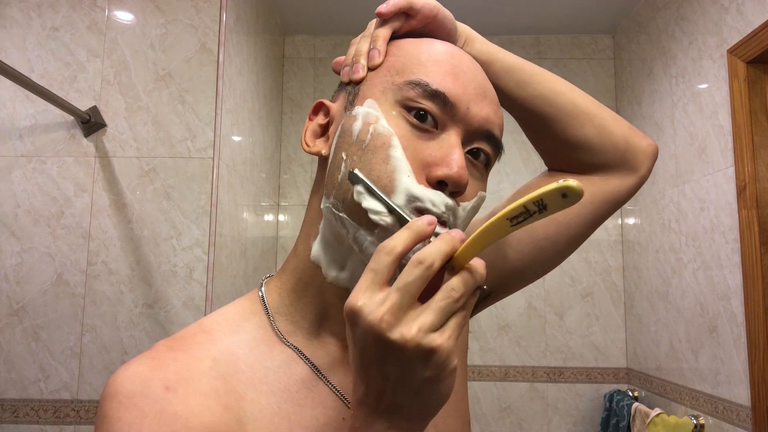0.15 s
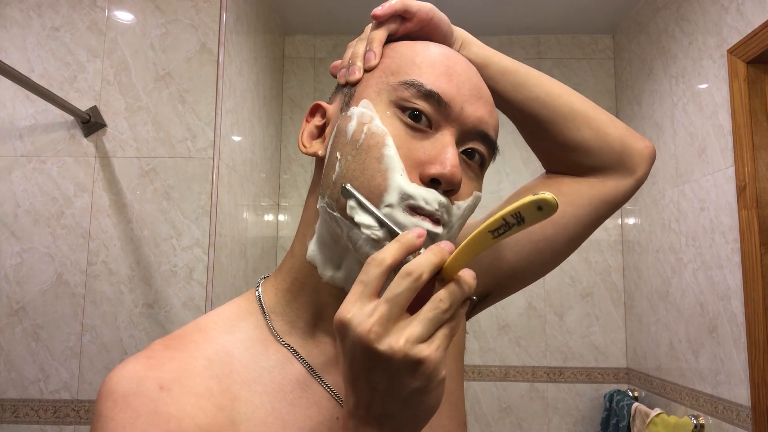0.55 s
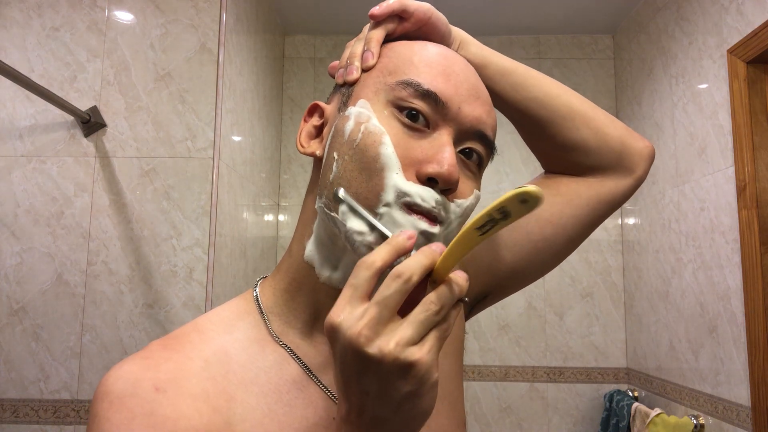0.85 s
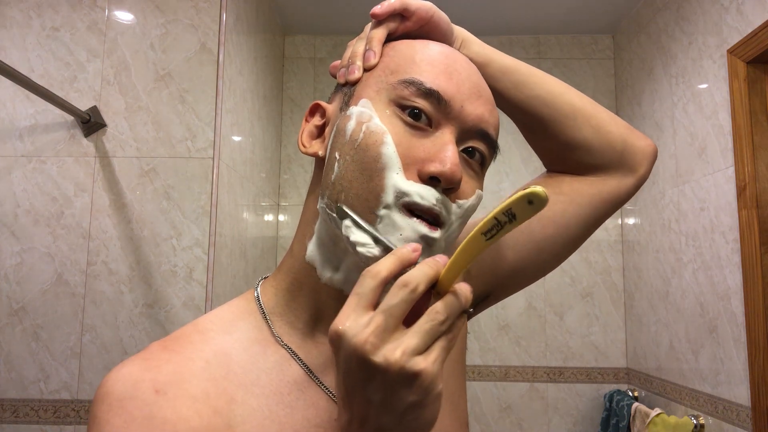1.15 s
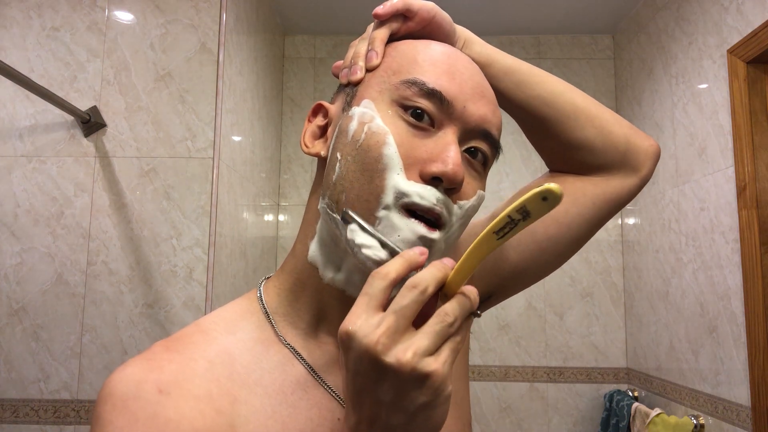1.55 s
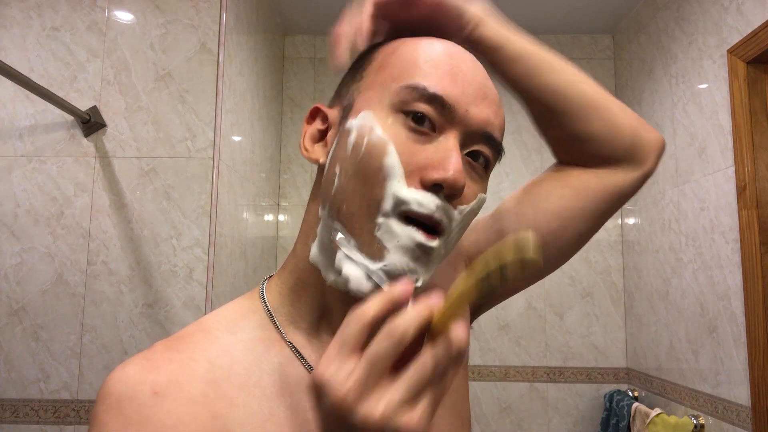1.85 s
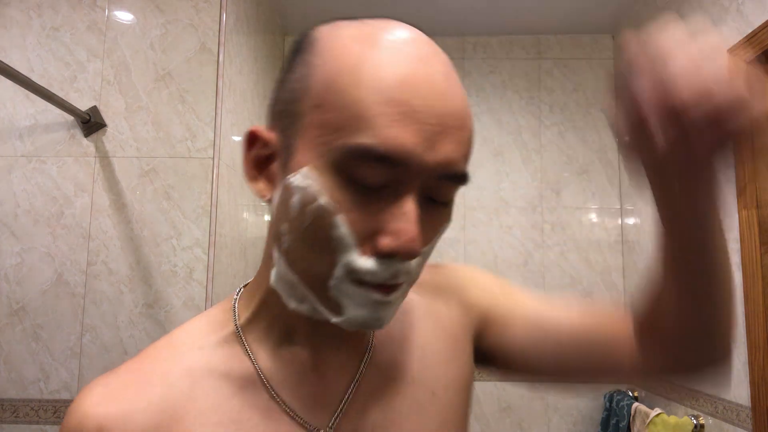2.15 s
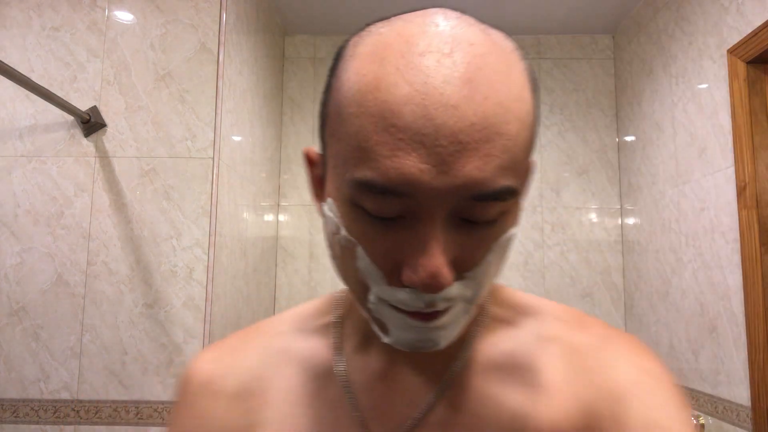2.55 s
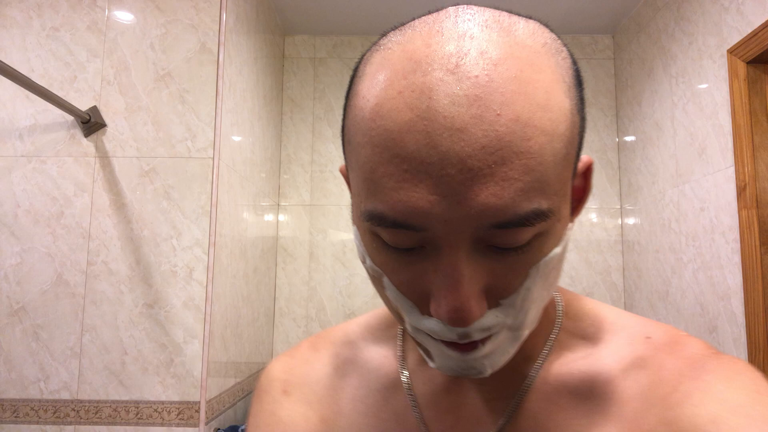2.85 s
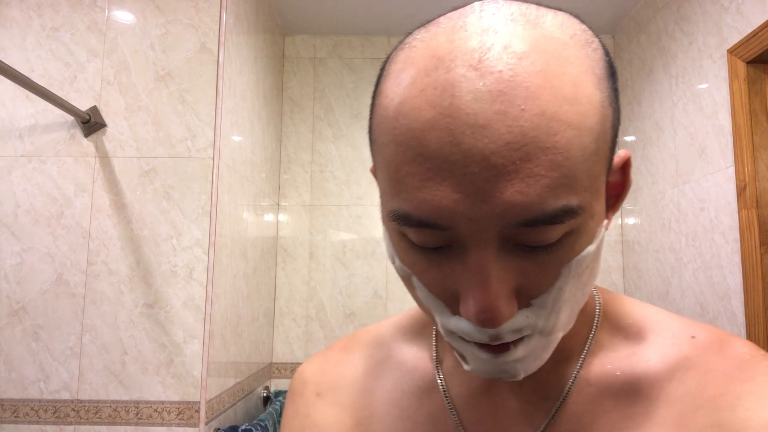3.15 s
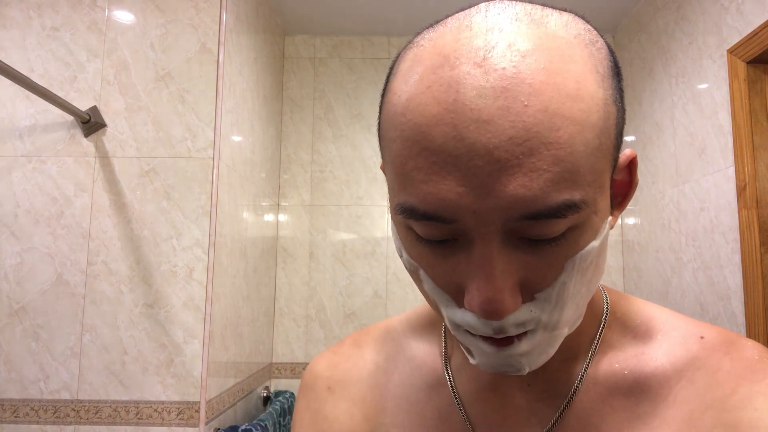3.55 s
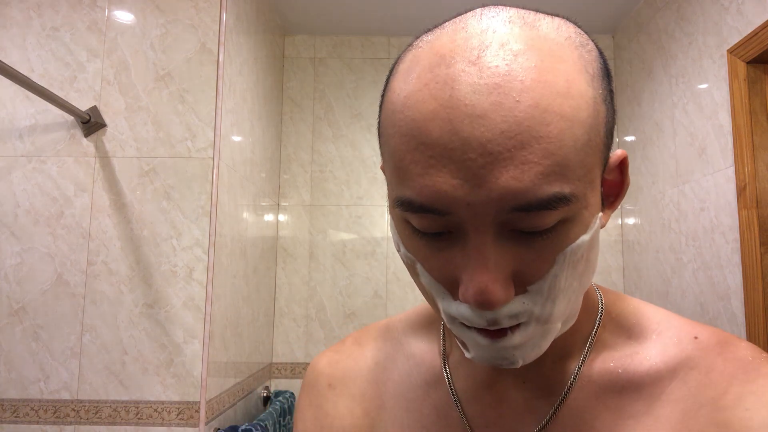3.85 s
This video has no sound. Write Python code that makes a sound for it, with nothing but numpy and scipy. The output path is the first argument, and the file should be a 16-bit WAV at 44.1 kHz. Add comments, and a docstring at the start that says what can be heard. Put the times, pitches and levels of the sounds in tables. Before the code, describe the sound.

A tap bursts on loudly into a basin after soft, scratchy razor scrapes in a tiled bathroom.

```python
"""A straight razor scrapes stubble in a small tiled bathroom: each cut hair is an impulse that excites the
blade. Behind it a fan hums as filtered noise, a low motor tone fades in, and ticks and rustles sound as noise
bursts. Bumps on the basin are a knock with a rattle. Then the tap handle knocks as it is lifted: the pipe
hisses and shudders, and the jet of noise and rising droplets lands, ringing the bowl over a gurgling drain."""
import sys
import numpy as np
from scipy import signal
from scipy.fft import rfft
from scipy.io import wavfile
from scipy.ndimage import uniform_filter1d

SR = 44100
rng = np.random.default_rng(int(sys.argv[2]) if len(sys.argv) > 2 else 0)


def wav_out(sig):
    """Save sig, one row per channel (or a flat mono array), as 16-bit PCM at SR to the path in sys.argv[1]."""
    wavfile.write(sys.argv[1], SR, np.round(np.clip(np.atleast_2d(sig).T, -1, 1) * 32767).astype(np.int16))


N = 176400  # samples, 4 s

# Low part of the fan and movement in the room: (time [s], level [dB])
ROOM_LEVEL = [(0, -65.5), (1.8, -64), (2.1, -62.5), (4, -63)]
# Spectrum of the fan's air: (frequency [Hz], density [dB per Hz])
HUM_SPECTRUM = [(35, -44), (48, -4), (140, -17), (240, -11.5), (322, -12), (552, -7.5), (871, -15.5),
                (1270, -20), (1380, -8.5), (1660, -51), (2600, -37.5), (4900, -32), (7800, -31.5),
                (8400, -39.5), (15500, -42.5)]
# Resonances of the fan: (frequency [Hz], width [Hz], gain [dB])
FAN_MODES = [(244.3, 87, 9.5), (1504, 65, -6)]
# Dull bumps on the basin, the last one the tap handle being lifted: (time [s], peak [dB], rattle brightness
# above 700 Hz [dB])
BUMPS = [(2.427, -45, 3.5), (2.435, -36.5, -4.5), (2.451, -43.5, 1), (2.462, -41, -0.5), (2.488, -46.5, -1),
         (2.582, -51.5, 23), (2.686, -47.5, -29), (2.849, -48.5, -9)]
# Spectrum of a bump: (frequency [Hz], density [dB per Hz])
BUMP_SPECTRUM = [(40, -35), (95, -2.5), (170, -7), (300, -3), (420, -2.5), (560, -11.5), (800, -20.5),
                 (1400, -9), (2300, -23), (3200, -41)]
# Small bright ticks and rustles:
# (time [s], level before halving [dB], pitch [Hz], t60 [s], width as share of pitch [1], rise [s])
TICKS = [(0.573, -56, 1280, 0.2, 0.057, 0.0084), (0.577, -58, 1620, 0.27, 0.27, 0.012),
         (1.917, -53, 10400, 0.13, 0.97, 0.0052), (2.058, -52.5, 4430, 0.038, 0.9, 0.0012),
         (2.058, -55.5, 3540, 0.29, 0.11, .001), (2.08, -51.5, 1430, 0.54, 1, 0.06),
         (2.2, -56.5, 5550, 0.22, 0.97, 0.027), (2.388, -51.5, 1500, 0.08, 0.64, 0.002),
         (2.443, -48, 5300, 0.27, 0.96, 0.027), (2.574, -58.5, 3930, 0.26, 0.66, 0.0043)]
# Bowl modes rung by the landing jet: (frequency [Hz], level [dB])
BOWL_MODES = [(223, -52), (375, -51.5), (404, -53)]
# Drain resonances under the flow: (frequency [Hz], width [Hz], gain per pass [dB])
DRAIN_MODES = [(144, 84, -5), (236, 33, -7.5), (289, 42, -5), (354, 68, -1.5)]
# Jet and splash: (time [s], level [dB])
FLOW_LEVEL = [(2.85, -70), (2.882, -82), (2.892, -68.5), (2.955, -59.5), (2.975, -50.5), (3.035, -44.5),
              (3.088, -45), (3.097, -36.5), (3.2, -40.5), (3.26, -38.5), (3.58, -39.5), (3.65, -38),
              (3.92, -38), (4, -37.5)]
# Spectrum of the pipe's hiss: (frequency [Hz], density [dB per Hz])
PIPE_SPECTRUM = [(520, -17.5), (1150, -5.5), (1400, 1), (1700, -15.5), (2150, -11.5), (2900, -30.5),
                 (5000, -29), (6500, -45)]
# Spectrum of the splash: (frequency [Hz], density [dB per Hz])
SPLASH_SPECTRUM = [(400, -39), (749, -25), (942, -25), (1360, 2), (1850, -3.5), (2220, -0.5), (2790, -6.5),
                   (3010, -3), (3480, -3), (4100, -1), (7550, -2.5), (15500, -9)]
# Resonances of spout and basin: (frequency [Hz], width [Hz], gain [dB])
SPOUT_MODES = [(1395, 107, 14), (2400, 180, -7), (3050, 250, 12), (4750, 80, 4), (5520, 170, 2),
               (5900, 370, 1), (6940, 960, -1.5), (7600, 98, 14.5)]
# Ringing splashes: (time [s], level [dB], starting pitch [Hz], t60 [s])
SPLASH_RINGS = [(3.66, -40, 2960, .2), (3.615, -50, 2115, 0.072), (3.62, -28, 2218, 0.058),
                (3.595, -42, 3030, 0.13), (3.665, -37, 2250, 0.1), (3.771, -45, 3000, 0.14),
                (5.5, -38, 2300, .1), (3.844, -37.5, 3050, 0.16), (3.966, -32, 3010, 0.072)]
# Razor strokes, pressure given as level: (start [s], end [s], level [dB])
STROKES = [(0, -0.006, -53.5), (0.269, 0.46, -66.5), (0.567, 0.604, -69.5), (0.696, 0.877, -66),
           (1.137, 1.26, -64.5), (1.505, 1.817, -64.5)]
# The blade catches in the stubble: (time [s], level before division by 3 [dB])
BITES = [(0.021, -48), (0.2884, -51), (0.3082, -48), (0.3314, -55), (0.3434, -54), (0.3614, -54),
         (0.4074, -58), (0.4184, -46.5), (0.451, -51), (0.7053, -63), (0.721, -44.5), (0.7417, -39),
         (0.7655, -41.5), (0.7804, -40), (0.828, -47), (0.87, -44.5), (1.151, -39.5), (1.1692, -39),
         (1.2384, -41.5), (1.5095, -63), (1.5309, -60), (1.5454, -46), (1.5606, -44), (1.591, -43),
         (1.6074, -44.5), (1.6333, -43.5), (1.6656, -47), (1.68, -48), (1.708, -36.5), (1.721, -37.5),
         (1.759, -44), (1.773, -39.5)]
# Spectrum of the scrape: (frequency [Hz], density [dB per Hz])
SCRAPE_SPECTRUM = [(600, -31), (900, -6), (1230, -12), (1750, -2), (2400, -11), (2760, -25), (3030, -4.5),
                   (3380, -20), (4040, -13.5), (5000, -0.5), (7500, -16), (9000, -29.5), (15500, -17.5)]
# Resonances of the blade: (frequency [Hz], width [Hz], gain [dB])
BLADE_MODES = [(1774, 100, -5), (2300, 140, -8.5), (2890, 85, -3), (4173, 36, 9.5), (4930, 110, 3.5),
               (5390, 120, 0.5), (5700, 260, -5.5), (6380, 300, -4.5), (7280, 120, -7.5)]

# Room and fan
TILES_T60_S = 0.44
FAN_DB, HUM_PATCHY_DB, TREBLE_AIR_DB = 5, 1.5, -58.5
MOTOR_HZ, MOTOR_DB = 61, -78
TONE_WAVER_DB = 2.2
# Bumps
BUMP_RISE_S, BUMP_T60_S, BUMP_WET_DB = 0.0038, 0.1, -4
KNOCK_DB, RATTLE_SPREAD_DB = 21.5, 5
# Tap, pipe and basin
PIPE_S, PIPE_DB = 2.85, -53
SHUDDER_S, SHUDDER_LENGTH_S, SHUDDER_DB, SHUDDER_HZ = 3.02, 0.089, -57.5, 78.2
LAND_S, LAND_HOLD_S, LAND_T60_S = 3.088, 0.096, 0.36
DRAIN_DB = -58.5
# Jet
SPOUT_DB, PATCHY_DB, FLICKER_DB = -10.5, 1.5, 1.2
SPOUT_WAVER_DB, SPUTTER_DB, WATER_WET_DB = 5, 0.5, -5
DROPS_PER_S, DROP_SPREAD_DB, DROPS_DB = 3000, 2, -3.5
RING_RISE_S, RING_GLIDE = 0.0022, .3  # the pitch rises by twice the glide share per second
# Razor
HAIRS_PER_S, HAIR_SPREAD_DB, BITE_HAIRS_PER_S = 1200, 3.5, 3500
PRESS_S, LIFT_T60_S = 0.0078, 0.16
BITE_RISE_S, BITE_T60_S = .0035, .055
BLADE_RING_DB, BLADE_WAVER_DB, RAZOR_WET_DB = 4, 4, -10
# Microphone
NOTCH_HZ, NOTCH_WIDTH_HZ, NOTCH_SHARE = 2770, 240, 0.8
EDGE_HZ = 15750


def gain_of(db):
    """Level law: 20 dB is a factor of ten in amplitude."""
    return 10 ** (np.asarray(db) / 20)


def evened(x):
    """Normalisation: scales x to rms 1."""
    return x / np.sqrt(np.mean(x ** 2) + 1e-20)


def band_even(x, lo, hi):
    """Parseval's theorem: scales x to rms 1 within a band, from its spectral energy there."""
    z, hz = rfft(x), np.fft.rfftfreq(len(x), 1 / SR)
    energy = np.sum(abs(z[(hz > lo) & (hz < hi)]) ** 2)
    return x * len(x) / np.sqrt(2 * energy)


def since(s):
    """Elapsed time in seconds, zero before the onset s."""
    return np.maximum(np.arange(N) / SR - s, 0)


def rise(s, length):
    """Linear onset from 0 to 1 over a length in seconds."""
    return np.minimum(since(s) / length, 1)


def bell(s, length):
    """Gaussian envelope centred on s."""
    return np.exp(-.5 * ((np.arange(N) / SR - s) / length) ** 2)


def curve(rows):
    """Envelope: levels interpolated in dB, silent outside the table."""
    times, levels = np.array(rows).T
    return gain_of(np.interp(np.arange(N) / SR, times, levels, -140, -140))


def shape(points, hz):
    """Spectral envelope: levels in dB interpolated over log frequency."""
    f, db = np.transpose(points)
    return gain_of(np.interp(np.log(hz + 1), np.log(f + 1), db, -70))


def colour(x, points):
    """Minimum-phase filtering: the Hilbert transform of the log spectrum gives a causal response."""
    hz = abs(np.fft.fftfreq(4096, 1 / SR))
    log_spectrum = np.conj(signal.hilbert(np.log(shape(points, hz))))
    taps = np.fft.ifft(np.exp(log_spectrum)).real[:2048]
    return signal.oaconvolve(x, taps)[:len(x)]


def ring(x, peaks):
    """Modal superposition: a parallel bank of resonances, each with a peak gain in dB."""
    out = np.zeros(len(x))
    for hz, width, db in peaks:
        out += gain_of(db) * signal.lfilter(*signal.iirpeak(hz, hz / width, SR), x)
    return out


def wander(size):
    """Low-passed chance: noise smoothed twice over size samples, at rms 1."""
    smooth = uniform_filter1d(rng.standard_normal(N), size=size)
    return evened(uniform_filter1d(smooth, size=size))


def restless(x, peaks, waver_db):
    """Independent modulation: resonances that each swell and fade by themselves."""
    return sum(gain_of(waver_db * wander(size=1200)) * ring(x, [peak]) for peak in peaks)


def waver(hz, db):
    """Amplitude and phase modulation: a tone whose level and phase wander."""
    level = gain_of(db + TONE_WAVER_DB * wander(size=1300))
    return level * np.sin(2 * np.pi * hz * np.arange(N) / SR + .5 * wander(size=1300))


def patchy(patchy_db, flicker_db):
    """Time-frequency modulation: white noise with drifting patches and a flicker shared by all pitches."""
    real, imag, patches = rng.standard_normal((N // 128 + 5, 257, 3)).T
    patches = uniform_filter1d(patches, size=8, axis=0)  # across pitch
    patches = evened(uniform_filter1d(patches, size=6, axis=1))  # across time
    flicker = evened(uniform_filter1d(rng.standard_normal(real.shape[1]), size=5))
    spectra = (real + 1j * imag) * gain_of(patchy_db * patches + flicker_db * flicker)
    return evened(signal.istft(spectra, nperseg=512, noverlap=384)[1][:N])


def clicks(per_s, spread_db):
    """Random impulse train: sparse clicks of either sign, with uneven levels, at rms 1."""
    chance, excess, sign = rng.random(N), rng.exponential(1, N), rng.choice([-1., 1.], N)
    return evened((chance < per_s / SR) * sign * gain_of(spread_db * np.minimum(excess, 4)))


def tiles(x, wet_db):
    """Reverberation: convolution with exponentially decaying noise adds the short bright room tail."""
    t = np.arange(SR // 2) / SR
    tail = rng.standard_normal(len(t)) * gain_of(-60 * t / TILES_T60_S) * (t > .003)
    return x + gain_of(wet_db) * signal.oaconvolve(x, tail / np.linalg.norm(tail))[:N]


def room():
    """Broadband fan noise with resonances; its low part swells as the man moves, and a low motor tone fades in."""
    air = patchy(HUM_PATCHY_DB, 0.15)
    fan = gain_of(FAN_DB) * evened(ring(air, FAN_MODES))
    hum = band_even(evened(colour(air, HUM_SPECTRUM)) + fan, 150, 900)
    low = signal.sosfiltfilt(signal.butter(2, 2400, fs=SR, output="sos"), hum)
    treble = hum - low
    motor = waver(MOTOR_HZ, MOTOR_DB) * rise(0.52, .5)
    return low * curve(ROOM_LEVEL) + treble * gain_of(TREBLE_AIR_DB) + motor


def ticks():
    """Noise bursts, from narrow and pitched to broad: two passes through one resonance, exponential decay."""
    out, t = np.zeros(N), np.arange(SR // 5) / SR
    for s, db, hz, t60, share, rise_s in TICKS:
        peak = [(hz, hz * np.clip(share, .01, 1), 0)]
        burst = evened(ring(ring(rng.standard_normal(len(t)), peak), peak))
        envelope = gain_of(db - 60 * t / t60) * np.minimum(t / rise_s, 1)
        out[round(s * SR):][:len(t)] += .5 * envelope * burst
    return out


def bumps():
    """Impact: an impulse gives the dull knock of the basin or the tap handle; a rattle of small contacts
    carries the brightness."""
    out, t = np.zeros(N), np.arange(SR // 5) / SR
    for s, db, bright_db in BUMPS:
        envelope = gain_of(RATTLE_SPREAD_DB * wander(size=60)[:len(t)] - 60 * t / BUMP_T60_S)
        rattle = rng.standard_normal(len(t)) * envelope * np.minimum(t / BUMP_RISE_S, 1)
        knock = gain_of(KNOCK_DB) * (np.arange(len(t)) == round(BUMP_RISE_S * SR))
        body = colour(rattle, [(f, d + bright_db * (f > 700)) for f, d in BUMP_SPECTRUM])
        body = body + colour(knock, [(f, d - 30 * (f > 700)) for f, d in BUMP_SPECTRUM])
        out[round(s * SR):][:len(t)] += gain_of(db) * body / abs(body).max()
    return tiles(out, BUMP_WET_DB)


def basin():
    """Modal excitation: the landing jet rings the bowl; the drain gurgles on; the pipe shudders as it opens."""
    bowl_decay = gain_of(-60 * since(LAND_S + LAND_HOLD_S) / LAND_T60_S)
    bowl = sum(waver(*mode) for mode in BOWL_MODES) * bowl_decay
    gurgle = ring(ring(patchy(0.91, 1), DRAIN_MODES), DRAIN_MODES)
    drain = gain_of(DRAIN_DB) * evened(gurgle)
    shudder = waver(SHUDDER_HZ, SHUDDER_DB) * bell(SHUDDER_S, SHUDDER_LENGTH_S)
    return rise(LAND_S, 0.0039) * (bowl + drain) + shudder


def pipe():
    """Flow noise: coloured noise hisses from the moment the pipe opens."""
    hiss = band_even(colour(patchy(.5, 1.2), PIPE_SPECTRUM), 1000, 1800)
    return hiss * rise(PIPE_S, 0.0017) * gain_of(PIPE_DB)


def drops():
    """Granular superposition: dense droplets, each seven cycles that rise in pitch."""
    out = np.zeros(N)
    for hz in np.geomspace(1100, 14000, 24):
        u = np.linspace(0, 1, int(7 * SR / hz))
        envelope = np.sin(np.pi * u ** .5) ** 2  # swells fast, fades slowly
        grain = envelope * np.sin(2 * np.pi * 7 * (u + .08 * u * (u - 1)))
        grain = grain * np.sqrt(hz) / np.linalg.norm(grain)
        out += signal.oaconvolve(clicks(DROPS_PER_S / 24, DROP_SPREAD_DB), grain)[:N]
    return evened(out)


def splash_rings():
    """Damped oscillation: gliding sines with exponential decay ring out of the splash."""
    out = np.zeros(N)
    for s, db, hz, t60 in SPLASH_RINGS:
        t = since(s)
        envelope = gain_of(db - 60 * t / t60) * rise(s, RING_RISE_S)
        out += envelope * np.sin(2 * np.pi * hz * t * (1 + RING_GLIDE * t))
    return out


def jet():
    """Source and filter: noise spray and droplets are coloured by the splash, the spout and the basin."""
    spray = patchy(PATCHY_DB, FLICKER_DB) + gain_of(DROPS_DB) * drops()
    spout = gain_of(SPOUT_DB) * evened(restless(spray, SPOUT_MODES, SPOUT_WAVER_DB))
    stream = tiles(evened(colour(spray, SPLASH_SPECTRUM)) + spout, WATER_WET_DB)
    stream = band_even(stream, 3000, 15000)
    before_landing = since(LAND_S) == 0
    sputter = gain_of(SPUTTER_DB * wander(size=200) * before_landing)  # air in the first water
    return stream * curve(FLOW_LEVEL) * sputter


def blade(hairs):
    """Forced resonance: the snaps of the hairs ring the blade."""
    scrape = band_even(colour(hairs, SCRAPE_SPECTRUM), 3500, 7500)
    ringing = band_even(restless(hairs, BLADE_MODES, BLADE_WAVER_DB), 3500, 7500)
    return band_even(scrape + gain_of(BLADE_RING_DB) * ringing, 3500, 7500)


def razor():
    """Impulsive excitation: each cut hair snaps; where the blade catches, many snap at once."""
    press, catch = np.zeros(N), np.zeros(N)
    for s, end, db in STROKES:
        press += rise(s, PRESS_S) * gain_of(db - 60 * since(end) / LIFT_T60_S)
    for s, db in BITES:
        catch += rise(s, BITE_RISE_S) * gain_of(db - 60 * since(s) / BITE_T60_S) / 3
    strokes = press * blade(clicks(HAIRS_PER_S, HAIR_SPREAD_DB))
    bites = catch * blade(clicks(BITE_HAIRS_PER_S, HAIR_SPREAD_DB))
    return tiles(strokes + bites, RAZOR_WET_DB)


def scene():
    """Linear superposition of all sources, alike in both channels."""
    water = pipe() + jet() + splash_rings()
    mono = room() + ticks() + bumps() + basin() + water + razor()
    return np.array([mono, mono])


def record(dry):
    """Linear filtering: a mono microphone with one narrow dip, then the band limit."""
    resonance = signal.iirpeak(NOTCH_HZ, NOTCH_HZ / NOTCH_WIDTH_HZ, SR)
    dipped = dry - NOTCH_SHARE * signal.lfilter(*resonance, dry)
    band_limit = signal.firwin(1023, EDGE_HZ, window=("kaiser", 9), fs=SR)
    return signal.oaconvolve(dipped, band_limit[None], "same")


dry = scene()
out = record(dry)
wav_out(out)
```